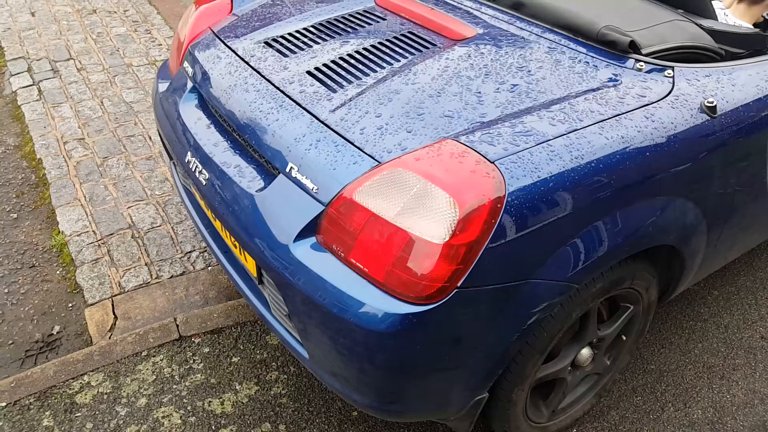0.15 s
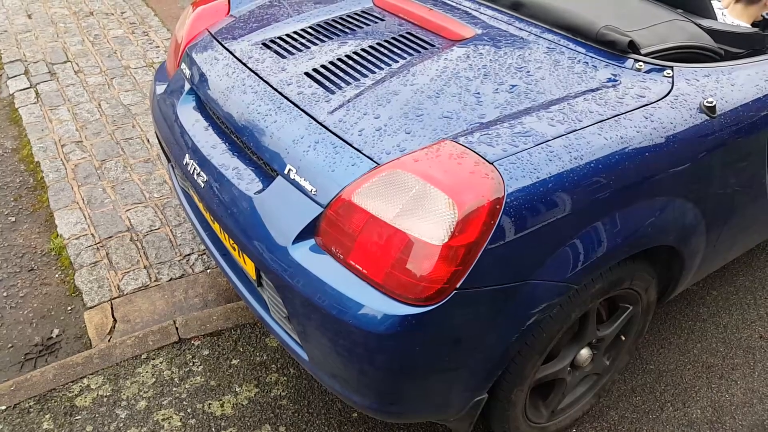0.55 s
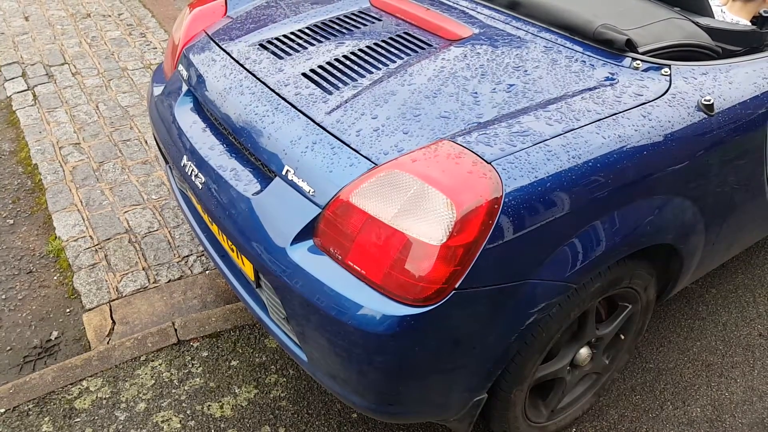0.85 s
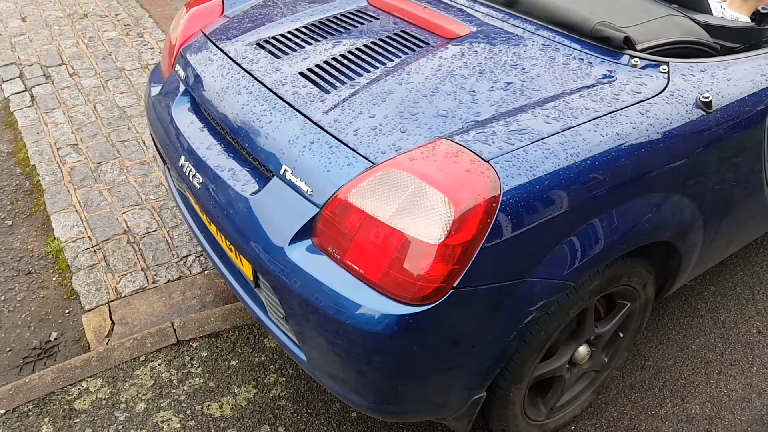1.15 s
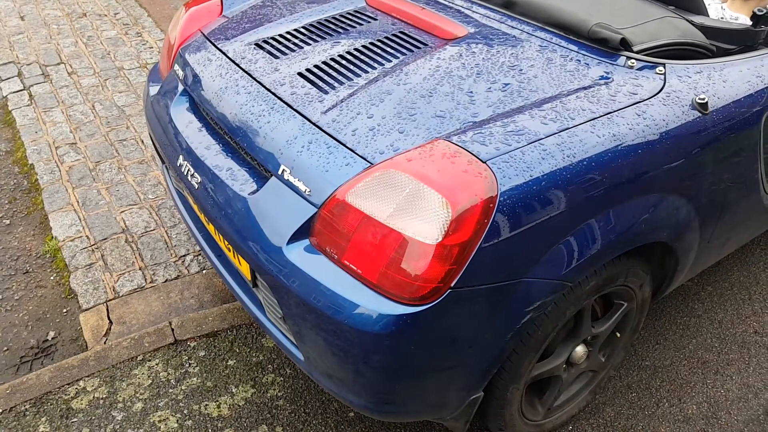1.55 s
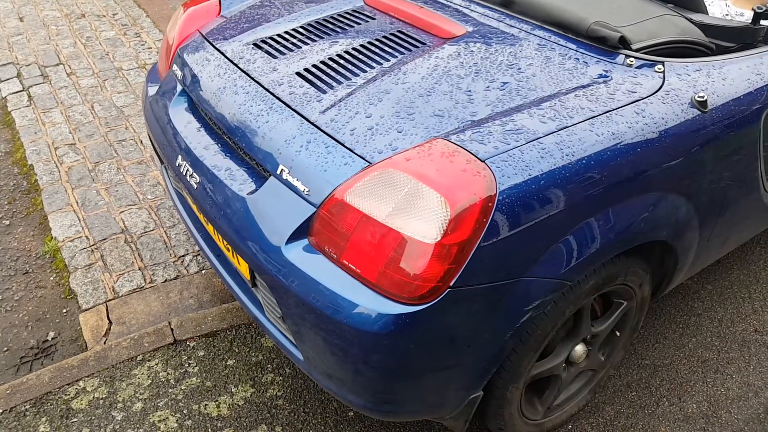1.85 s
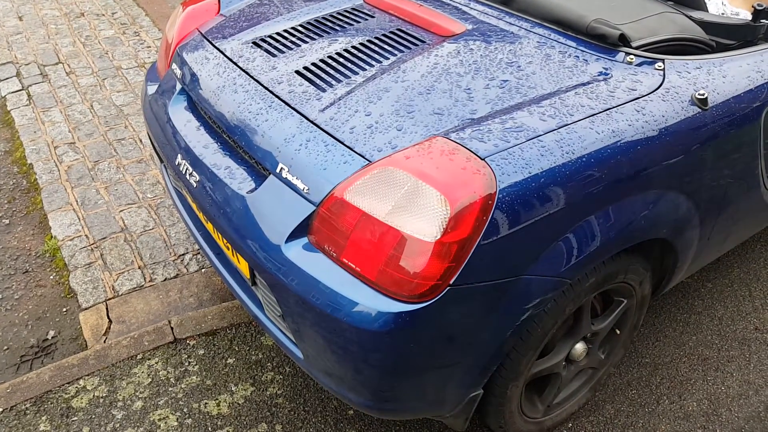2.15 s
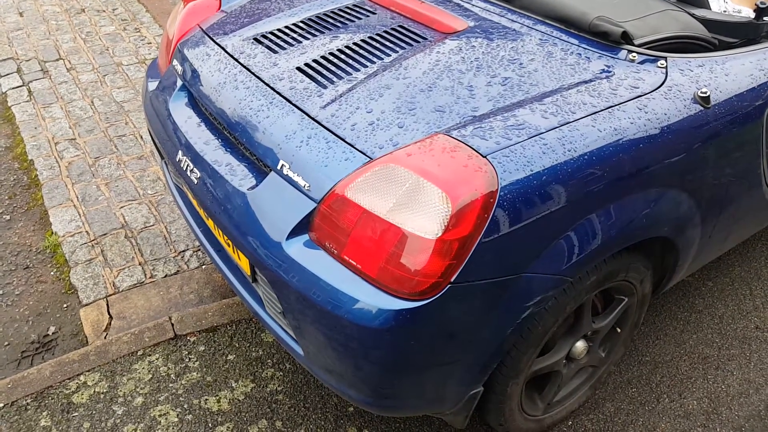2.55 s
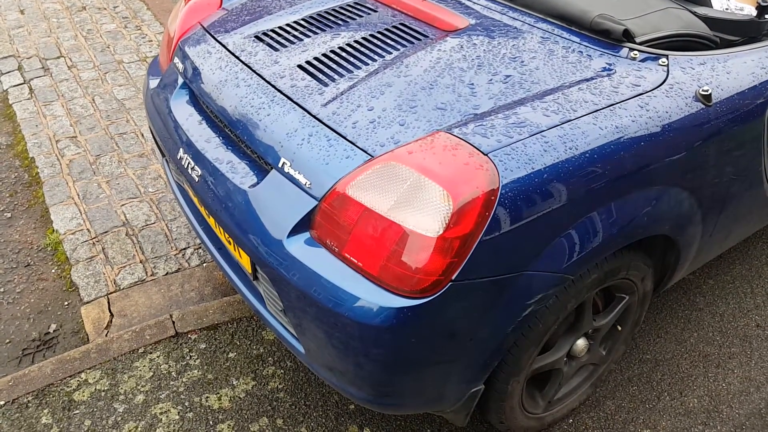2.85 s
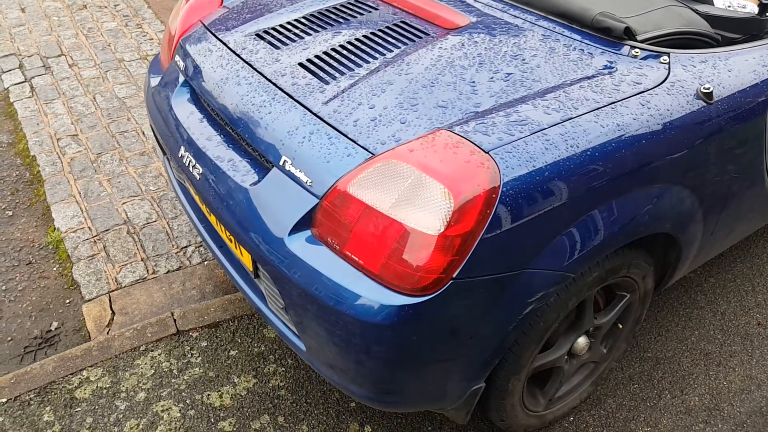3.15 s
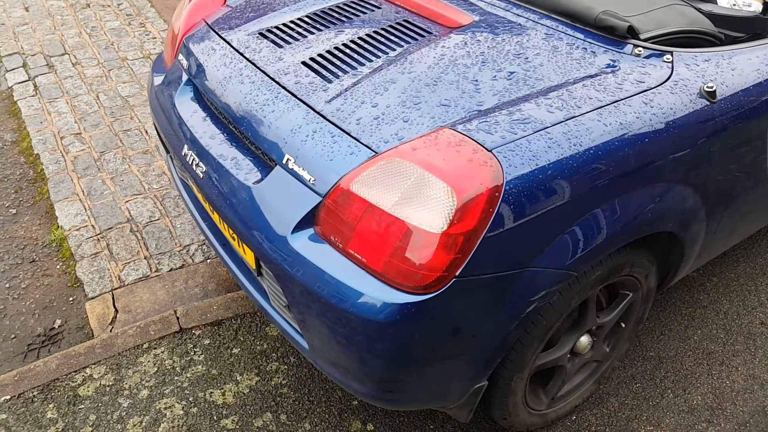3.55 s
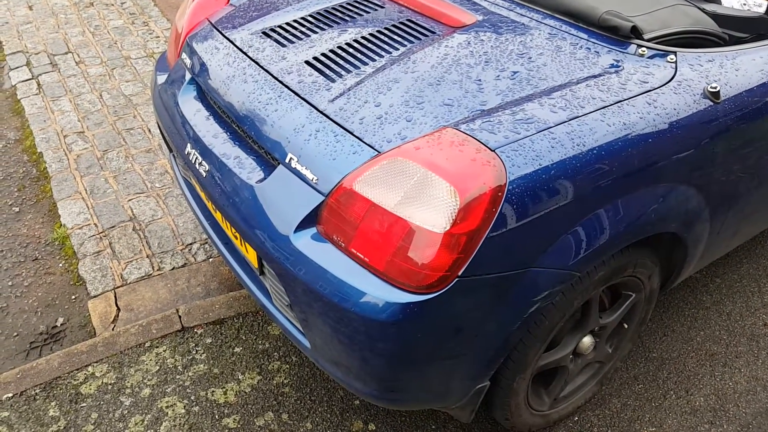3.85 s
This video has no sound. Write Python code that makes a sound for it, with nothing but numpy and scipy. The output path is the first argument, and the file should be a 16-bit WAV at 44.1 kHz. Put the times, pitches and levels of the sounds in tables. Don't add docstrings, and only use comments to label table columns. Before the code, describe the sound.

Car engine starts: pump hum, brief starter cranking, then it catches, flares and idles lumpily

```python
import sys
import numpy as np
from scipy import signal
from scipy.io import wavfile

SR = 44100
rng = np.random.default_rng(int(sys.argv[2]) if len(sys.argv) > 2 else 0)


def output_pcm(signal):
    pcm = np.clip(np.atleast_2d(signal).T, -1, 1) * 32767
    wavfile.write(sys.argv[1], SR, np.round(pcm).astype(np.int16))


def attenuation_scalar(level_db):
    decades = np.asarray(level_db, float) / 20
    return 10 ** decades


N = 176400
T = np.arange(N) / SR

# (frequency [Hz], likeness [-1 to 1])
LIKENESS = [(60, 0.27), (640, 1), (1400, 1), (2500, 0.21), (5000, 0.57), (10000, 0.05)]
# (frequency [Hz], balance [dB])
STREET_PAN = [(60, 6), (240, -1.5), (950, 0.5), (3770, -4.5), (15000, 25)]
# (frequency [Hz], balance [dB])
BAY_PAN = [(60, -2.5), (290, 1.4), (640, 2.5), (1410, 1.8), (4000, 0.8), (6500, 29), (9000, 76.5),
           (15000, 8.5)]
# (time [s], effort [dB], share of bass [dB])
BURN = [(2.17, -8, 5), (2.23, 0, 2), (2.33, 1, 3), (2.7, 2.5, -0.5), (2.87, 2.5, -1.5), (3.12, 1.5, 3),
        (3.2, 0, -0.5), (3.3, 1.5, 1.5), (3.8, 1.5, -2.5), (4, 4, 1.5)]
# (time [s], unevenness [0-1])
LOPE = [(2.2, .4), (2.45, .15), (2.72, .2), (2.9, 1), (3.82, 1), (3.97, .3)]
# (time [s], level [dB])
INTAKE = [(1.6, -54), (1.8, -43), (2.132, -41), (2.142, -37), (2.25, -31.5), (2.6, -31), (2.84, -35.5),
          (2.89, -43.5), (3.82, -44.5), (3.93, -39), (4, -30)]
STARTER_ON_S = 1.55
BAY_LAG = 5


def rms_one(x):
    return x / np.sqrt(np.mean(x ** 2) + 1e-20)


def in_time(rows):
    s, *columns = np.transpose(rows)
    return [np.interp(T, s, c) for c in columns]


def at_hz(points, hz):
    points = np.array(points)
    return np.interp(np.log(hz), np.log(points[:, 0]), points[:, 1])


def drift(rate):
    step = 40
    r = np.exp(-2 * np.pi * step * rate / SR)
    white = rng.standard_normal(N // step + 2002)
    slow = signal.lfilter([1], [1, -2 * r, r * r], white)[2000:]
    return np.interp(np.arange(N) / step, np.arange(len(slow)), rms_one(slow))


def resonance(x, hz, width_hz, stages=1):
    r = np.exp(-np.pi * width_hz / SR)
    poles = [1, -2 * r * np.cos(2 * np.pi * hz / SR), r * r]
    for _ in range(stages):
        x = signal.lfilter([(1 - r * r) / 2, 0, (r * r - 1) / 2], poles, x + 1e-18)
    return x


def pan(balance, hz):
    gains = attenuation_scalar(at_hz(balance, hz) * np.array([[.5], [-.5]]))
    return 2 * gains / gains.sum()


def spread(mid, side, hz):
    alike = np.clip(at_hz(LIKENESS, hz), -1, 1)
    return np.sqrt(1 + alike) * mid + np.sqrt(1 - alike) * side * [[1], [-1]]


def noise(spectrum, patchy_db, balance):
    out, together = 0, drift(3)
    edges = 28 * 2 ** np.arange(0, 9.6, .5)
    white = rng.standard_normal((2, 2, N))
    for k, (low, high) in enumerate(zip(edges, edges[1:])):
        hz = np.sqrt(low * high)
        if hz < spectrum[0][0] / 2 or hz > 2 * spectrum[-1][0]:
            continue
        band = signal.butter(2, [low, high], "band", fs=SR, output="sos")
        mid, side = signal.sosfilt(band, white[k % 2])
        flicker_db = patchy_db * (0.6 * together + drift(28.0))
        gain = attenuation_scalar(at_hz(spectrum, hz) + flicker_db)
        out = out + gain * pan(balance, hz) * spread(mid, side, hz)
    return out / np.sqrt(np.mean(out.mean(axis=0) ** 2))


def swells(rows):
    return sum(attenuation_scalar(db) * np.exp(-.5 * ((T - s) / width) ** 2) for s, width, db in rows)


def bursts(rows, fall_s):
    return sum(attenuation_scalar(db) * (T > s) * np.exp(-np.abs(T - s) / fall_s) for s, db in rows)


def traffic():
    # (frequency [Hz], level [dB])
    far = [(18, -48), (30, -20), (202, -7.5), (307, -18), (455, -16.5), (2550, -22), (3230, -20.5),
           (4310, -27), (15500, -60.5)]
    return attenuation_scalar(-45) * noise(far, 0.86, STREET_PAN)


def tyre_swish():
    # (peak time [s], width [s], level [dB])
    passing = [
        (1.08, 0.11, -43.5),
    ]
    return swells(passing) * rms_one(resonance(rng.standard_normal((2, N)), 1610, 1200, 2))


def pedal_thuds():
    # (peak time [s], width [s], level [dB])
    thuds = [
        (.77, 0.042, -37.5),
        (1.15, 0.054, -48),
        (1.39, 0.074, -36.5),
    ]
    # (frequency [Hz], width [Hz], level [dB])
    body = [(84, 20, -7), (176.8, 15, -1), (260, 48, -5), (339, 30, -7.5), (723, 73, -18)]
    push = rng.standard_normal(N)
    shell = sum(attenuation_scalar(db) * rms_one(resonance(push, hz, width, 2)) for hz, width, db in body)
    return swells(thuds) * rms_one(shell)


def pump():
    # (time [s], rotor frequency [Hz], hum level [dB], whine level [dB])
    run = [(.7, 311.5, -44.5, -50.5), (1.1, 312.6, -43.5, -51), (1.15, 299.4, -47, -53),
           (1.18, 295.4, -39.5, -55), (1.205, 282, -49, -61), (1.255, 273.5, -39.5, -52),
           (1.3, 260, -57, -58), (1.45, 234.3, -55, -58), (1.53, 218, -78.5, -60.5)]
    # (multiple of rotor frequency, level [dB])
    hum, whine = [(1, 7), (1.31, -10.5), (1.642, -13.5)], [(8.8, -4), (12, 0), (13.2, -8), (17.6, -13), (21, -14), (24, -8),
                               (35.8, -17)]
    # (frequency [Hz], gain [dB])
    tank = [(2500, -4), (3300, 2), (3740, 0), (4200, -5), (4900, 8), (5700, 0), (6900, -11)]
    # (frequency [Hz], level [dB])
    flow = [(1470, -45), (2500, -6), (3780, -9), (4330, -50), (5570, -40), (6150, -5.5), (15500, -24.5)]
    off_s, hum_lag = 1.54, 16
    hz, *curves = in_time(run)
    slowing = 1 - hz / hz[0]
    turn = 2 * np.pi * np.cumsum(hz) / SR
    out = attenuation_scalar(-59) * (hz / hz[0]) ** 5.2 * noise(flow, 1.1, STREET_PAN)
    for partials, level_db in zip((hum, whine), curves):
        for k, db in partials:
            high = k > 2
            level = level_db + db + high * at_hz(tank, k * hz)
            level = level + (1.2 + 4 * high * slowing) * drift(31)
            lag = np.array([[0], [hum_lag * (k < 2) - BAY_LAG]])
            phase = k * (turn - 2 * np.pi * hz / SR * lag)
            phase = phase + high * (0.22 + 2.5 * slowing) * drift(60)
            out += np.sqrt(2) * attenuation_scalar(level) * np.sin(phase) * pan(STREET_PAN, k * hz[0])
    return out * np.clip((off_s - T) / 0.02, 0, 1)


def starter():
    # (start [s], attack [s], hold [s], level [dB], share below 1 kHz [dB])
    grinds = [
        (1.534, 0.02, 0.0073, -26.5, -7),
        (1.617, 0.028, 0.06, -42, 8.5),
        (1.777, 0.033, 0.034, -26.5, 1),
        (1.95, 0.0037, 0.016, -30, 1),
        (2.075, 0.022, 0.0074, -29.5, 3),
        (2.144, 0.073, 0.12, -29.5, 2),
    ]
    # (time [s], peak level [dB])
    knocks = [
        (1.5576, -14.5),
        (1.5758, -15),
        (1.8016, -28),
        (1.9555, -30),
        (2.088, -38),
    ]
    # (frequency [Hz], width [Hz], level [dB])
    housing = [(208, 57, -11.5), (736, 87, -15), (1126, 27, -8), (1550, 40, -5), (2012, 20, -9),
               (2640, 78, -13.5), (3130, 18, -12), (5140, 41, -40)]
    # (frequency [Hz], level [dB])
    rough = [(180, -59), (300, 0), (446, -14.5), (808, 1), (892, -39), (1540, 0.5), (2250, -12),
             (3130, -6.5), (15500, -39)]
    # (peak time [s], width [s], level [dB])
    spin_hum, song = [(1.62, 0.034, -38.5), (1.72, 0.034, -42)], [(2.04, 0.041, -53), (2.15, 0.044, -56)]
    off_s, teeth_per_s, fall_db_per_s = 2.42, 3000, 178
    whirr = attenuation_scalar(-45) * np.clip((T - STARTER_ON_S) / 0.011, 0, 1) * np.clip((off_s - T) / 0.048, 0, 1)
    dull_load = whirr.copy()
    load = whirr + attenuation_scalar(-7) * bursts(knocks, 0.007)
    for s, attack, hold, db, low_db in grinds:
        fall_db = fall_db_per_s * np.maximum(T - s - attack - hold, 0)
        effort = np.clip((T - s) / attack, 0, 1) ** 2 * attenuation_scalar(db - fall_db)
        load = load + effort
        dull_load = dull_load + attenuation_scalar(low_db) * effort

    strength = attenuation_scalar(2.6 * np.minimum(rng.exponential(1, (2, N)), 4))
    struck = rng.random((2, N)) < teeth_per_s / SR
    teeth = strength * rng.choice([-1, 1], (2, N)) * struck
    out = attenuation_scalar(-5) * noise(rough, 3.8, BAY_PAN)
    for hz, width, db in housing:
        mid, side = rms_one(resonance(teeth, hz, 3 * width, 2))
        out += attenuation_scalar(db - 6 + 2.0 * drift(15)) * pan(BAY_PAN, hz) * spread(mid, side, hz)
    low = signal.lfilter(*signal.butter(1, 1000, fs=SR), out)
    hum = swells(spin_hum) * rms_one(resonance(rng.standard_normal(N), 224, 48, 2))
    tone = swells(song) * rms_one(resonance(teeth, 1532, 40, 2))
    return load * (out - low) + dull_load * low + tone + hum


def belt():
    # (peak time [s], width [s], level [dB])
    squeak = [
        (3.51, .014, -45),
    ]
    return swells(squeak) * rms_one(resonance(rng.standard_normal(N), 3680, 60))


def intake():
    # (frequency [Hz], level [dB])
    spectrum = [(1470, -3), (2500, 6.5), (4010, -12.5), (4370, -11.5), (5370, -5), (7980, -10),
                (10400, -17.5), (12300, -15.5), (15500, -16)]
    # (frequency [Hz], width [Hz], level [dB])
    whistles = [(2974, 89, -28), (3060, 40, -54), (5100, 17, -19), (8080, 200, -18), (8750, 38, -43)]
    # (time [s], peak level [dB])
    chuffs = [(2.179, -28), (2.2274, -33), (2.2508, -19), (2.299, -19.5), (2.3451, -20.5), (2.3844, -25),
              (2.4193, -19.5), (2.4864, -26), (2.543, -21), (2.6364, -18.5), (2.796, -25), (2.8294, -25)]
    air = noise(spectrum, 1.76, BAY_PAN)
    air += sum(attenuation_scalar(db) * rms_one(resonance(air, hz, width)) for hz, width, db in whistles)
    steady_db, = in_time(INTAKE)
    return (attenuation_scalar(steady_db) * (T > STARTER_ON_S) + attenuation_scalar(-10) * bursts(chuffs, 0.015)) * air


def crank():
    # (time [s], turns done)
    rotation = [(2.168, 0), (2.294, 1.5), (2.376, 2.5), (2.446, 3.5), (2.573, 5.5), (2.698, 7.5),
                (2.830, 9.5), (3.047, 12.5), (3.194, 14.5), (3.417, 17.5), (3.709, 21.5), (3.849, 23.5),
                (3.974, 25.5), (4.2, 29.5)]
    s, done = np.transpose(rotation)
    half_turns = np.arange(58)
    at = np.interp(half_turns / 2, done, s)
    at[1:-1] = (at[:-2] + 2 * at[1:-1] + at[2:]) / 4
    return at[at < N / SR], np.interp(T, at, half_turns / 2)


def clatter(turns):
    # (frequency [Hz], level [dB])
    spectrum = [(240, -27), (400, -8.5), (494, -6.5), (715, -8), (884, -14), (1560, -12), (5000, -31),
                (6500, -73), (11000, -120)]
    effort_db, _ = in_time(BURN)
    uneven, = in_time(LOPE)
    intake_db, = in_time(INTAKE)
    running = np.clip(turns / 2.8, 0, 1)
    pulse = 1 + 0.1 * np.cos(4 * np.pi * (turns - .25))
    pulse = pulse + 0.084 * uneven * np.cos(2 * np.pi * (turns - .75))
    level = attenuation_scalar(-26 + effort_db + 0.25 * (intake_db - intake_db.max()))
    return level * running * pulse * noise(spectrum, 0.32, BAY_PAN)


def exhaust(at):
    # (frequency [Hz], width [Hz], level [dB], delay [s], gain of weaker firing [dB])
    pipe = [(58, 59, -9.5, 0.0068, 2), (87.3, 32, -8, 0.003, 1), (143, 165, -7.5, 0.0029, 4),
            (224, 51, 0.5, 0.00063, -7), (307.9, 47.3, 0, 0.00663, -14), (346.3, 54, -5, 0.0116, 1.5),
            (417.7, 33, -16, 0.0057, 1), (568.4, 44, -17, 0.00472, 7.5), (725.5, 25.6, -20.5, 0.00604, 5),
            (958.6, 16, -22.5, 0.00617, 6), (1203, 57, -21, 0.0065, -3), (1570, 43, -20.5, .006, -9),
            (185.5, 24, -11, 0.00021, 0), (256.4, 43, -7, 0.0031, 16)]
    # (bass [dB], body [dB], upper [dB])
    catches = [(-1, 3, -3), (-1, -6, -2.5), (-2.5, -1.5, -2), (-2.5, 0, -3), (-3.5, 0.5, 0.8),
               (5.3, 0.5, -1), (-3.5, -2, -0.5), (4.5, 2.5, 0.3), (-11, -8.5, 2), (2.2, 1.5, 1)]
    # (time [s], level [dB])
    puffs = [
        (1.584, -13),
        (1.692, -17),
        (1.844, -12.5),
        (1.98, -12),
        (2.106, -17),
    ]
    early_s, scatter_db, catch_over_s, flare_db = 0.00552, 1.83, 2.5, 2.5
    effort_db, bass_db = in_time(BURN)
    uneven, = in_time(LOPE)
    i = (at * SR).astype(int)
    effort_db, bass_db, uneven = effort_db[i], bass_db[i], uneven[i]
    weak = (np.arange(len(i)) + 1) % 2 * uneven
    scatter = rng.normal(0, scatter_db, (len(i), len(pipe)))
    scatter[i < catch_over_s * SR] *= 1.5
    catch_db = np.pad(catches, ((0, len(i) - len(catches)), (0, 0)))
    puff_s, puff_db = np.transpose(puffs)
    out = 0
    for m, (hz, width, db, delay, weak_db) in enumerate(pipe):
        low = int(hz < 170)
        part = int(hz > 250) + 1 - low
        level_db = effort_db + weak_db * (weak - .5 * uneven) + scatter[:, m]
        level_db = level_db + catch_db[:, part] + low * bass_db
        level_db = level_db + flare_db * (240 < hz < 290) * (1 - uneven)
        shift_s = delay - early_s * weak * (1 - low)
        clicks = np.zeros(N + SR)
        clicks[i + (shift_s * SR).astype(int)] = attenuation_scalar(level_db)
        clicks[(puff_s * SR).astype(int)] = attenuation_scalar(puff_db - 8.6 * (1 - low))
        left = resonance(clicks[:N], hz, width, 3)
        right_lag_s = .00014 * (hz < 400) + .0004 * low
        ring = np.array([left, np.interp(T - right_lag_s, T, left)])
        out = out + (-1) ** m * attenuation_scalar(db) * pan(BAY_PAN, hz) * rms_one(ring)
    return attenuation_scalar(-15.5) * 0.79 * rms_one(out)


def engine():
    at, turns = crank()
    return exhaust(at) + clatter(turns) + intake() + belt()


def scene():
    return traffic() + tyre_swish() + pedal_thuds() + pump() + starter() + engine()


def top_cut(x):
    return signal.sosfilt(signal.butter(12, 15670, fs=SR, output="sos"), x)


def record(dry):
    overload = 1.1
    right = np.roll(dry[1], BAY_LAG)
    ports = np.array([dry[0], right - resonance(right, 2670, 233)])
    soft = overload * np.tanh(ports / overload)
    cut = signal.sosfilt(signal.ellip(10, .5, 70, 15700, fs=SR, output="sos"), soft)
    fade = np.clip((T - 0.4) / 0.3, 0, 1) ** 1.16
    return top_cut(cut * fade)


dry = scene()
out = record(dry)
output_pcm(out)
```